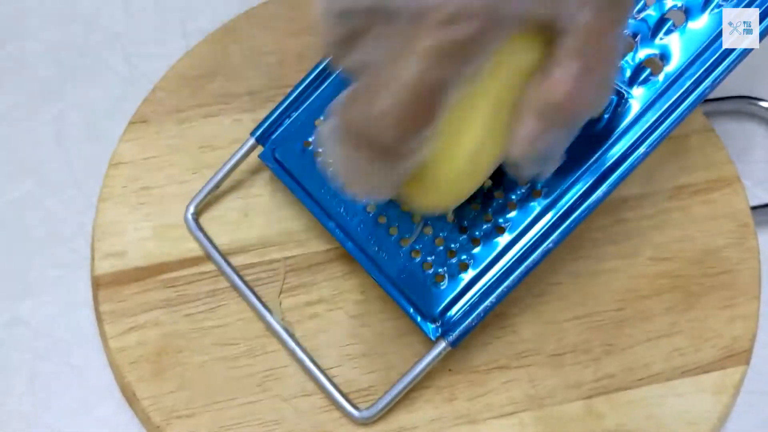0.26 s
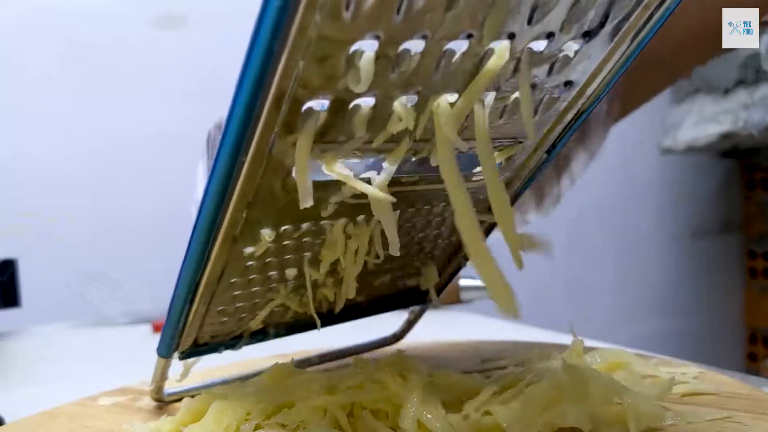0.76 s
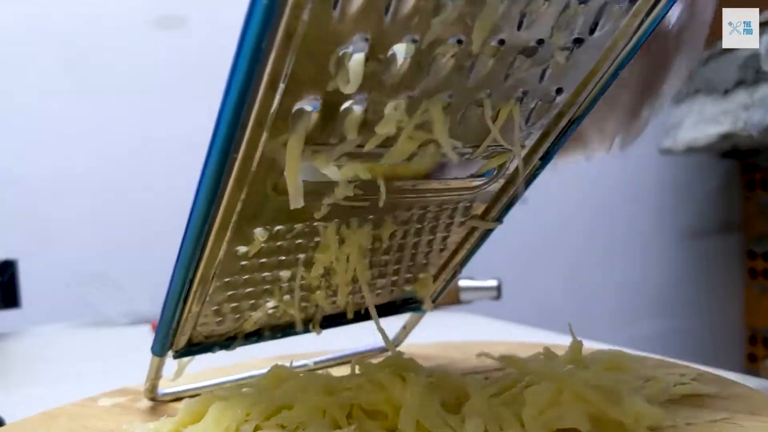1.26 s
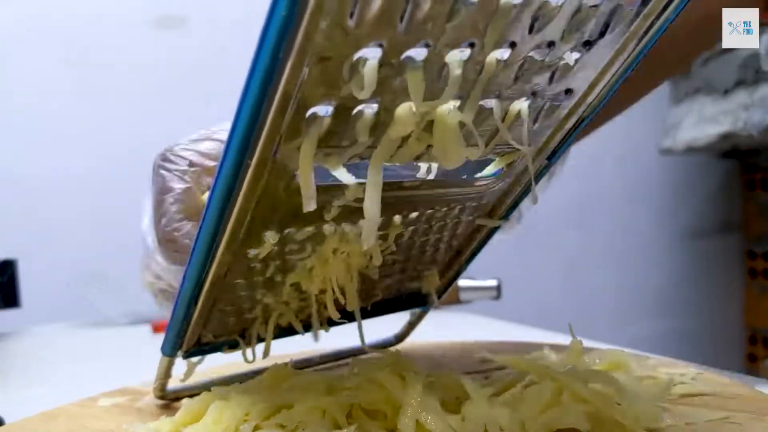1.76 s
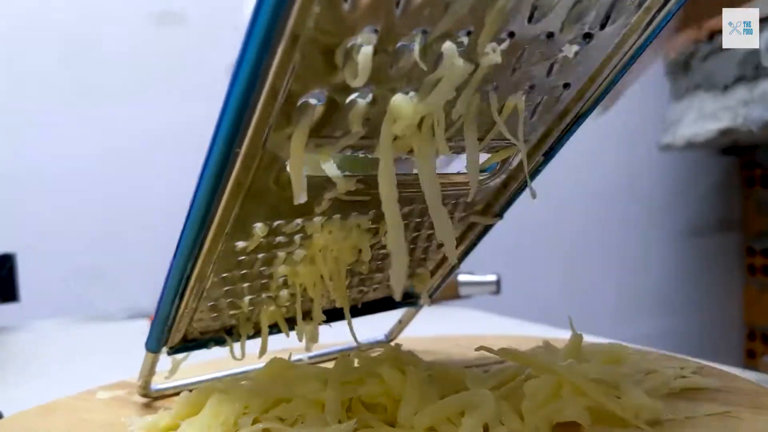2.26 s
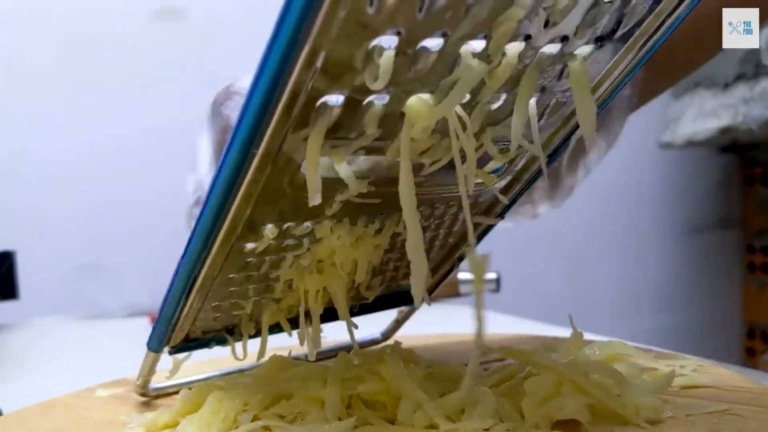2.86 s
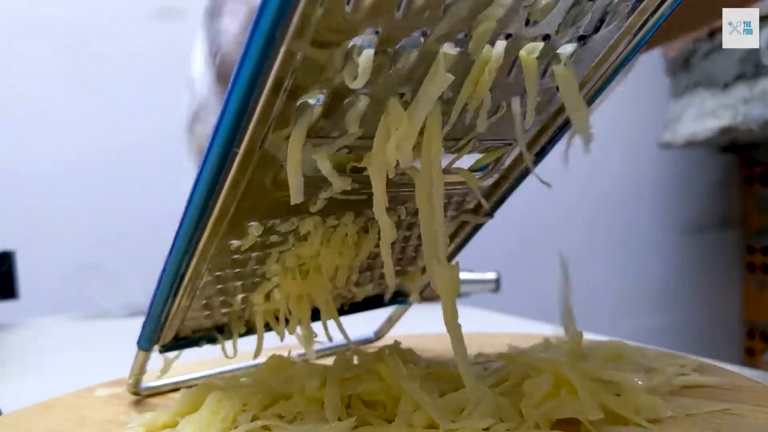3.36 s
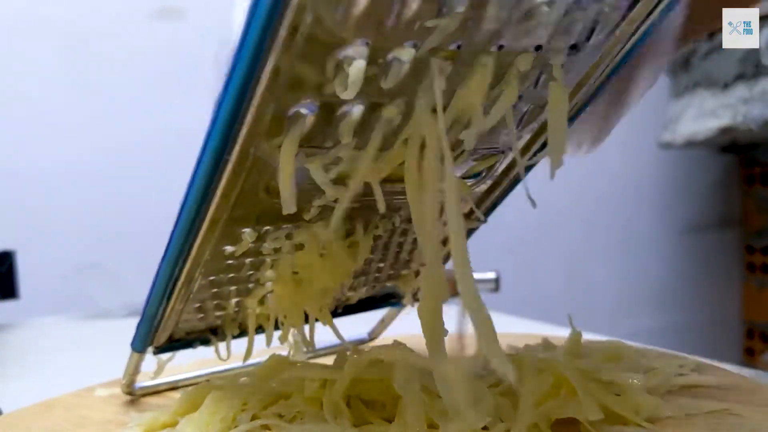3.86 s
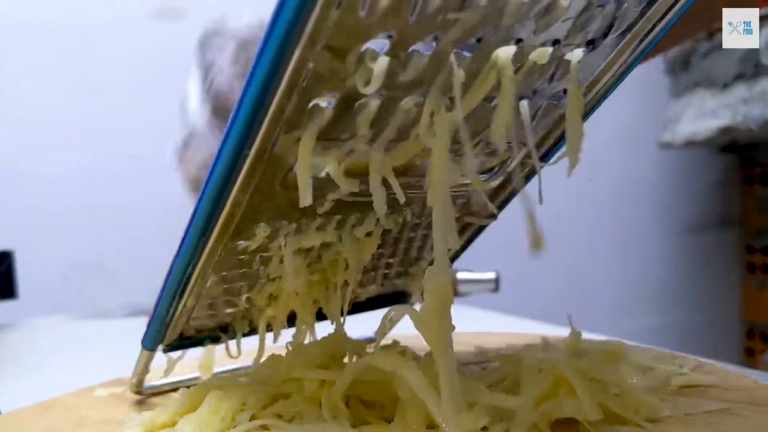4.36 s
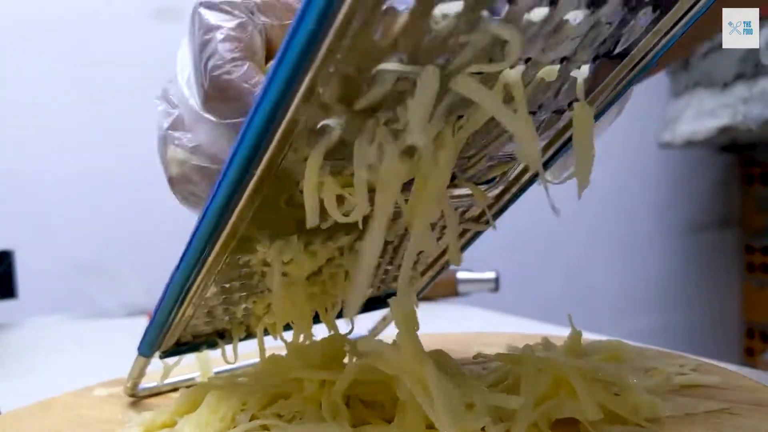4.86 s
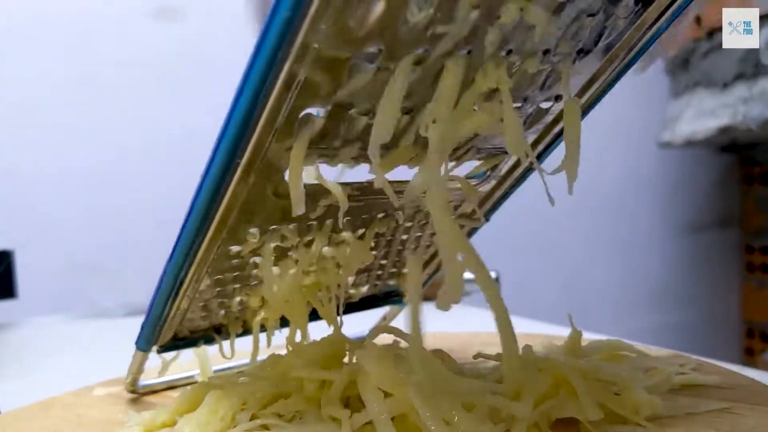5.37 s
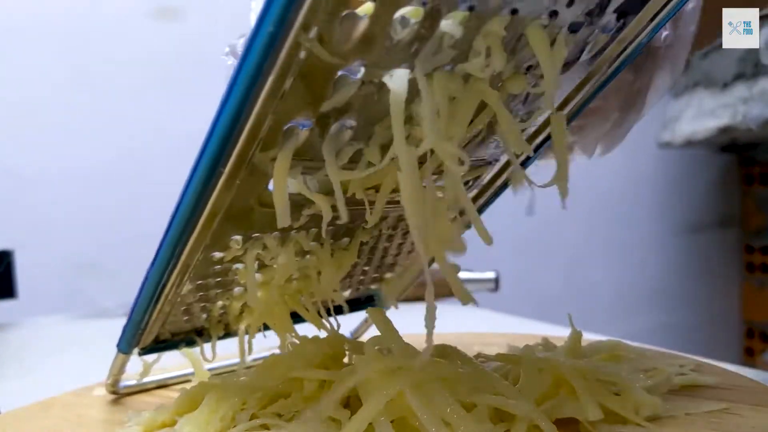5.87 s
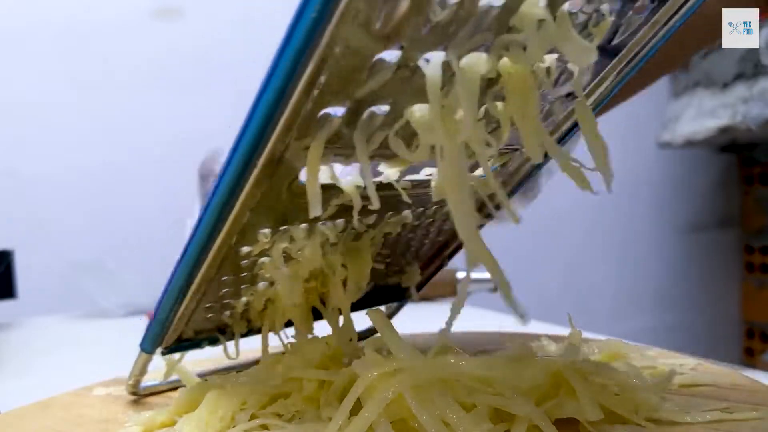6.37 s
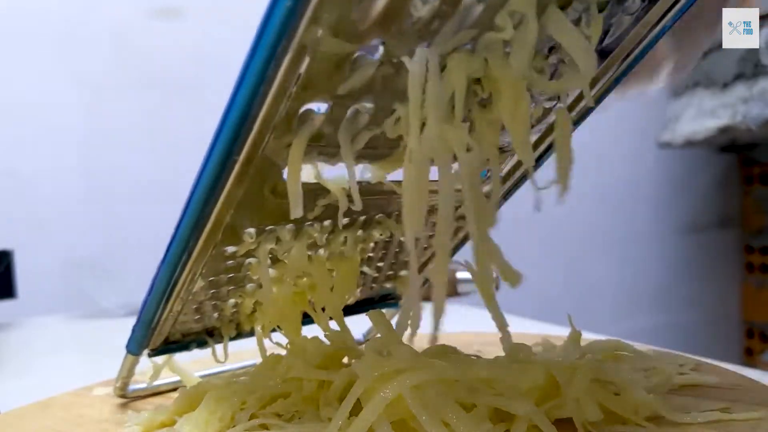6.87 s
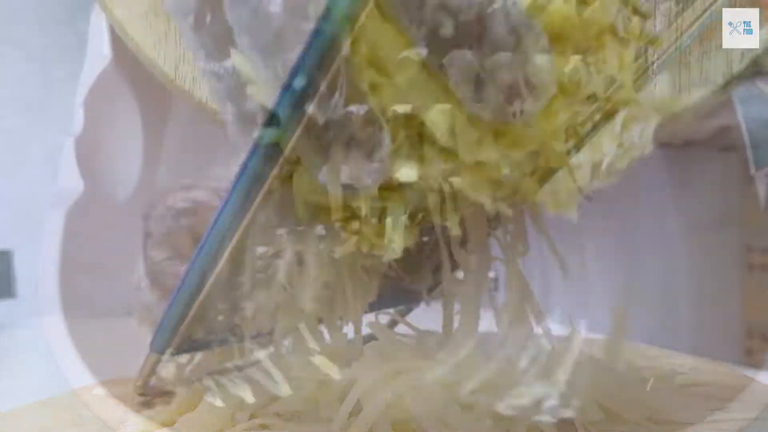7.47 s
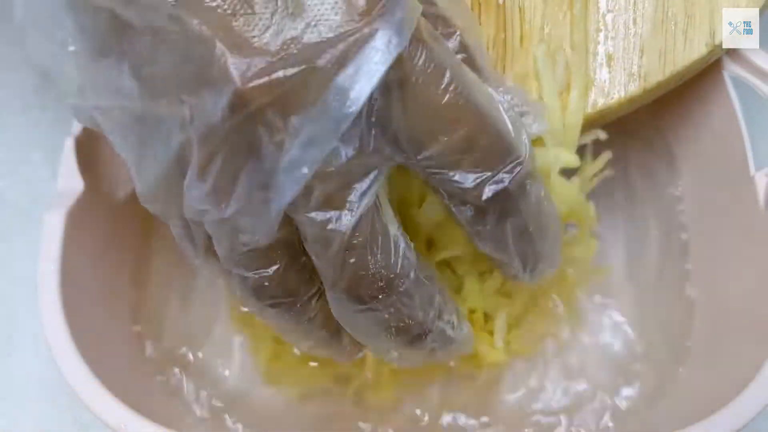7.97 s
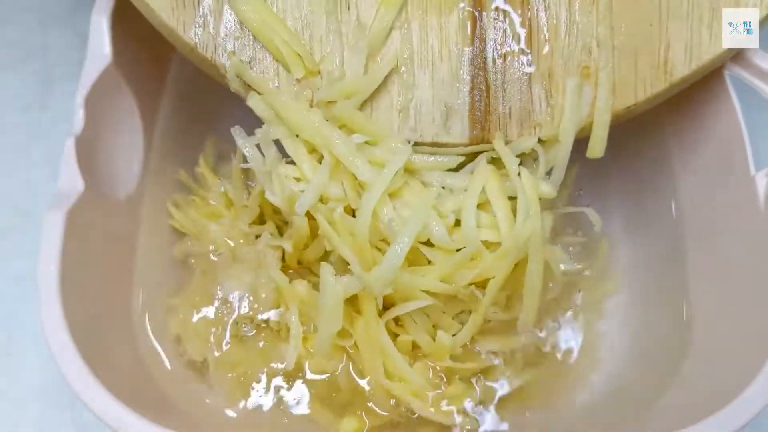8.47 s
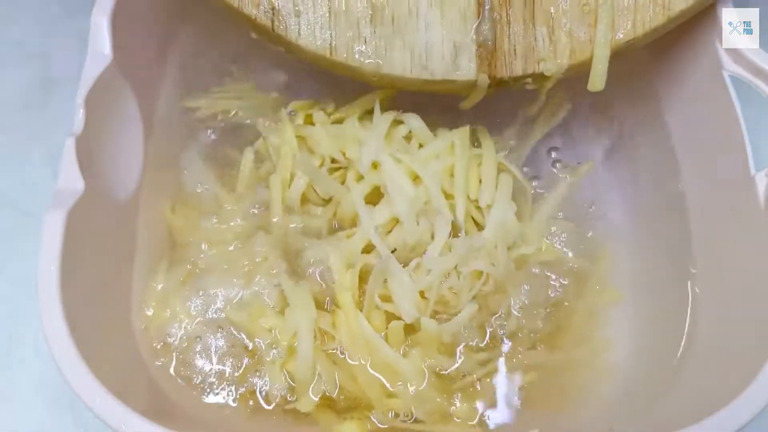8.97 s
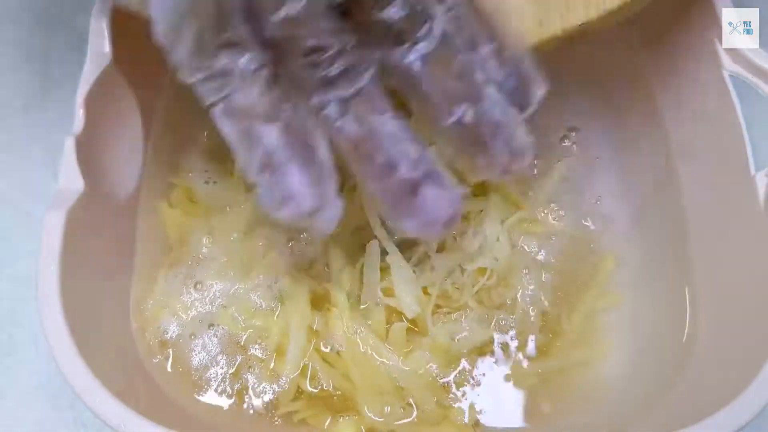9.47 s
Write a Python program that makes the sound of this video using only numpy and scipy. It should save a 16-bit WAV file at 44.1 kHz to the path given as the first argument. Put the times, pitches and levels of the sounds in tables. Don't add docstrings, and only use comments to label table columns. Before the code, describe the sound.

Crisp, wet grating at about three strokes a second with metallic ring and woody thuds, giving way to soft sloshing and rustling in a water bowl.

```python
import sys
import numpy as np
from scipy import signal
from scipy.fft import rfft, irfft, next_fast_len
from scipy.io import wavfile
from scipy.ndimage import uniform_filter1d, minimum_filter1d

SR = 44100
rng = np.random.default_rng(int(sys.argv[2]) if len(sys.argv) > 2 else 0)


def output_pcm(signal):
    pcm = np.clip(np.atleast_2d(signal).T, -1, 1) * 32767
    wavfile.write(sys.argv[1], SR, np.round(pcm).astype(np.int16))


def ratio_of_db(decibels):
    return 10 ** (np.asarray(decibels, float) / 20)


N = 428211

# (frequency [Hz], level per Hz [dB])
AIR = [(35, 0), (60, 8.5), (145, -1), (206, 6.5), (521, -10.5), (642, -7.5), (1100, -11.5), (1700, -9.5),
       (2530, -15.5), (5450, -31), (15500, -46)]
# (frequency [Hz], width [Hz], level [dB])
DRONE = [(129, 11.4, -14), (199.2, 1.3, 0), (231, 5, -11)]
# (frequency [Hz], width [Hz], level [dB])
WHINE = [(619, 1.5, -2), (667.5, 1.5, 0)]
# (time [s], drone level [dB], whine level [dB])
APPLIANCE = [(0, -51, -70), (7.2, -59, -58), (7.75, -51, -68), (8.3, -61, -63), (8.45, -54, -63),
             (8.75, -50, -63), (9.0, -48, -81), (9.3, -40.5, -67), (9.71, -49, -66)]
# (start [s], end [s], level [dB], frequency [Hz], width [Hz])
WALLOW = (8.55, 9.15, -55, 95, 45)

# (time [s], level [dB])
CRINKLE = [(0.0, -29), (0.21, -39), (0.54, -31), (0.64, -34), (1.1, -37), (1.91, -26.5), (2.59, -44),
           (3.07, -22.5), (4.01, -36), (5.52, -31), (5.83, -30.5), (6.97, -22.5), (7.45, -36)]
# (frequency [Hz], level per Hz [dB])
RUSTLE = [(1470, -42), (2500, 2), (2850, 2.5), (4430, 3.5), (5880, 5), (6390, 6), (9010, 2.5), (13900, 5.5),
          (15500, 4)]
# (time [s], peak [dB], centre frequency [Hz])
GLOVE_SNAPS = [(0.0323, -24, 3100), (0.269, -24, 3160), (0.3446, -32, 5380), (0.3834, -34, 6230),
               (0.414, -30.5, 5420), (0.439, -33, 7400), (0.9094, -31, 11100), (1.0164, -47, 3910),
               (1.0345, -52, 5280), (1.0475, -35, 11400), (1.916, -25, 3770), (1.924, -28.5, 5070),
               (2.0144, -23, 5270), (2.0537, -27, 3390), (2.319, -26, 4750), (2.375, -29.5, 5300),
               (2.7716, -28, 7140), (3.1124, -11, 9000), (3.1353, -42, 6300), (3.523, -30, 7400),
               (4.1854, -32, 4610), (4.2166, -20, 4460), (4.4952, -46, 7590), (4.7084, -41, 5330),
               (4.7855, -13.5, 7620), (5.7704, -34, 5000), (5.798, -29, 4230), (5.8714, -34, 8490),
               (6.5296, -24, 5350), (6.557, -20, 3980), (6.5884, -17, 3290), (6.9431, -23, 8500),
               (6.974, -33, 8100), (7.278, -30, 5380), (7.3914, -47, 4420)]
# (time [s], peak [dB], centre frequency [Hz])
BOWL_SNAPS = [(7.4684, -57, 8210), (7.4999, -25, 7120), (7.5305, -29, 5720), (7.558, -28, 6380),
              (7.5777, -26, 5450), (7.5953, -17.5, 7320), (7.6425, -29, 11300), (7.6735, -32, 5620),
              (7.72, -32, 6440), (7.7433, -31, 4860), (7.8244, -32, 13800), (7.854, -29, 8170),
              (7.8814, -38, 8060), (7.9049, -34.5, 8290), (7.9423, -27, 13500), (7.9807, -23, 13300),
              (7.9977, -24, 7500), (8.0245, -24, 6290), (8.083, -34, 6990), (8.097, -22, 5350),
              (8.1254, -19, 14000), (8.1664, -16.5, 10300), (8.168, -17.5, 6200), (8.2082, -24, 13000),
              (8.238, -23, 7260), (8.2955, -21, 9450), (8.3494, -30, 5550), (8.4207, -25, 5380),
              (8.4627, -32, 13200), (8.5074, -37, 5410), (8.865, -25, 7390), (8.88, -24, 13350),
              (8.9236, -29.5, 5400), (9.0808, -34, 5440), (9.1122, -30.5, 5380), (9.1734, -23, 13900),
              (9.1945, -35, 6410), (9.6824, -26, 6560)]
SNAP_DB, SNAP_NOISE_S, SNAP_TONE_S = 7.5, 0.014, 0.0067

# (time [s], level [dB], t60 [s], jolt of the frame [dB])
LANDINGS = [(0.023, -40.5, 0.52, 1.5), (0.411, -59, 0.075, -16), (0.638, -33.5, 0.21, -5),
            (0.932, -24, 0.097, -9.5), (1.308, -32, 0.072, -3), (1.647, -38, 0.055, 4),
            (2.006, -42.5, 0.045, -8.5), (2.995, -34.5, 0.19, -2), (3.032, -61, 0.3, -6),
            (3.173, -44.5, 0.33, -1), (3.442, -34, 0.085, -8.5), (3.9, -43.5, 0.54, 1.5),
            (3.854, -25.5, 0.066, -9.5), (4.207, -44.5, 0.46, 3.5), (4.496, -38, 0.19, -1),
            (4.996, -55.5, 0.3, -7), (5.147, -37.5, 0.25, -1.5), (5.795, -57, 0.024, -7),
            (5.826, -37.5, 0.45, -0.5), (6.517, -37, 0.35, 0.5), (6.862, -29, 0.34, -2.5),
            (7.324, -35, 0.088, -1.5), (7.37, -27, 0.0056, -23)]
LAND_S, STAY_S = 0.0081, 0.013
# (start [s], rise [s], length [s], bite [dB], plate ring over the tearing [dB])
CUTS = [(0.068, 0.012, 0.097, -25.5, -3.5), (0.462, 0.07, 0.084, -24.5, -7.5),
        (0.678, 0.02, 0.13, -24, -9.5), (1.054, 0.053, 0.099, -22.5, -8), (1.366, 0.039, 0.084, -23, -8),
        (1.686, 0.031, 0.1, -22, 0.3), (2.067, 0.055, 0.09, -21, 0.5), (2.471, 0.019, 0.14, -25, 2.5),
        (2.861, 0.055, 0.086, -20, -10.5), (3.209, 0.038, 0.067, -20.5, -11.5),
        (3.585, 0.017, 0.15, -23.5, -9.5), (3.947, 0.052, 0.087, -17.5, -12.5),
        (4.274, 0.032, 0.061, -20.5, -9.5), (4.574, 0.041, 0.062, -21, -9),
        (4.885, 0.027, 0.053, -22.5, -11), (5.189, 0.048, 0.09, -19, -11.5),
        (5.514, 0.039, 0.1, -19.5, -11), (5.874, 0.027, 0.058, -21.5, -13.5),
        (6.18, 0.048, 0.073, -19, -11), (6.328, 0.031, 0.05, -25, -7.5), (6.629, 0.031, 0.1, -22, -6.5),
        (6.978, 0.047, 0.079, -20, -9), (7.114, 0.002, 0.018, -30.5, -8)]
LET_GO_S = [0.16, 0.097, 0.063, 0.088, .11, 0.11, 0.17, 0.057, 0.1, 0.19, 0.072, 0.085, 0.12, 0.12, 0.068,
            0.061, 0.12, 0.047, 0.072, 0.1, .11, 0.22, 0.17]
GRIP_DB = [-1, -0.5, 2, 2.5, 2, 0.9, 0.8, 0.8, 1.2, 3, 1, 1.5, 3.5, 1, -2, -1, 0.2, -2.5, 2.5, 1.5, 2, 0.5,
           1.5]
# (start [s], swell [s], level [dB], t60 [s], jolt of the frame [dB])
RETURNS = [(1.044, 0.014, -40, 0.6, 15), (2.756, 0.025, -42.5, 0.25, 4.5), (3.068, 0.038, -31, 0.9, -5),
           (3.472, 0.012, -42, 1, -6), (4.774, 0.0089, -31, 0.36, -1.5), (5.045, 0.022, -41.5, 1, -6.5),
           (5.382, 0.11, -34, 0.067, -3.5), (6.05, 0.11, -35.5, 0.026, -8), (6.547, 0.022, -38, 0.24, 5.5)]
DIG_IN = 0.78
SAG_DB, LET_GO_BEND = -1.8, 1.766
TRAIL_DB, TRAIL_S = -21, 0.85
LINGER_DB, LINGER_S = -55, 0.15
BUZZ_DB, SHUDDER_DB, BUZZ_PER_RING = -8.5, -11, 0.37
RING_GROWS_DB, BUZZ_GROWS_DB, SHUDDER_GROWS_DB = 6, 5.5, 1.5
LIGHT_RING_DB, RING_PER_JOLT, LIGHT_SHUDDER_DB, SHUDDER_PER_JOLT = -3, 0.87, 0.5, 1.23
LESS_BUZZ_UNTIL_S, LESS_BUZZ_DB = 0.537, -4.5

# (frequency [Hz], level per Hz [dB])
TEAR = [(900, -47), (1500, -28.5), (2500, -8.5), (3580, -15), (4680, -7.5), (6900, -6.5), (7510, -0.5),
        (9080, -4), (13200, -4.5), (15500, -6.5)]
# (frequency [Hz], level per Hz [dB])
PLATE_BODY = [(500, -38), (1100, -10), (1500, -4), (2500, -0.5), (3500, 0.5), (4500, -2), (8000, -10)]
# (frequency [Hz], width [Hz], level [dB])
PLATE = [(1623, 160, -14), (2114, 190, -7), (2737, 150, -2.5), (2886, 75, 1), (3250, 74, -5),
         (4260, 420, -9), (5380, 330, -3), (6560, 350, -1.5), (7180, 40, -6.5), (8210, 150, -12)]
# (frequency [Hz], width [Hz], level [dB])
FRAME = [(277.2, 46.4, 1.5), (423, 107, -1), (514, 35.6, 5), (716, 275, -3.5), (845, 95, 1.5),
         (1022, 250, -7)]
# (frequency [Hz], width [Hz], level [dB])
BOARD = [(55.3, 11, -7), (124.2, 24.6, 0.5), (192, 65, 5.5), (255, 175, -3)]
CALM_DB = -29

# (time [s], peak [dB])
TICKS = [(0.032, -21), (0.27, -30.5), (0.945, -33), (0.985, -38), (1.652, -39), (1.1954, -27),
         (1.229, -27.5), (1.2554, -35), (2.2324, -20), (2.2736, -23), (2.6514, -20.5), (2.691, -21),
         (2.7994, -31), (3.3475, -27), (4.379, -22), (4.421, -28), (4.4737, -30), (4.4935, -35),
         (4.515, -36), (4.536, -33), (5.327, -28)]
# (frequency [Hz], width [Hz], level [dB])
LOOSE_PLATE = [(1670, 42, -8), (1850, 200, -11), (2300, 1600, -12), (2860, 28, -5), (4290, 300, -14),
               (5350, 45, -10)]
# (time [s], peak [dB])
PINGS = [(0.938, -29), (1.065, -36), (1.115, -29), (1.315, -32.5), (1.44, -28), (4.212, -35),
         (4.782, -22.5), (4.81, -41), (5.55, -27), (5.6, -31), (6.868, -29), (6.905, -30.5)]
# (frequency [Hz], width [Hz], level [dB])
FREE_FRAME = [(519, 10, 5.5), (753, 39, -7), (926, 45, -11)]
# (time [s], peak [dB])
BOWL_KNOCKS = [
    (7.814, -40),
    (9.237, -39),
]
# (frequency [Hz], width [Hz], level [dB])
BOWL = [(210, 6.8, 13), (290, 20, -2), (416, 27, -11), (663, 21, 2), (980, 53, 1.5), (1620, 140, 1),
        (2600, 900, -10)]

# (time [s], peak [dB], pitch [Hz], cycles to the top)
BUMPS = [(0.041, -24.5, 134, 1.7), (0.154, -25.5, 240, 0.84), (0.235, -17.5, 132, 1.5),
         (0.476, -31.5, 132, 1.3), (0.694, -41, 196, 2.5), (0.76, -27, 181, 1.1), (0.795, -25, 142, 1.7),
         (0.949, -26, 196, 1.5), (1.146, -15, 140, 1.54), (1.188, -13, 167, 1.26), (1.414, -23, 189, 1.8),
         (1.469, -24.5, 183, 1.85), (1.737, -28, 160, 1.3), (1.787, -19.5, 153, 1.3),
         (2.141, -22.5, 124, 2.8), (2.221, -12.5, 130, 0.72), (2.491, -15, 128, 0.91),
         (2.538, -17.5, 190, 1.9), (2.594, -16.5, 141, 1.9), (2.629, -4.5, 170, 1.45),
         (2.776, -26, 122, 1.8), (2.927, -16.5, 142, 1.2), (3.122, -30, 161, 1.4),
         (3.276, -13.5, 173, 1.33), (3.54, -30, 156, 1.4), (3.665, -29, 129, 1.7), (3.733, -19, 144, 1.14),
         (3.876, -21, 129, 1.6), (3.927, -24, 137, 1.4), (4.049, -17, 154, 1.3), (4.225, -32, 180, 1.8),
         (4.34, -16, 145, 1.3), (4.358, -21, 193, 1.4), (4.374, -6.5, 174, 1.73), (4.513, -23.5, 128, 1.1),
         (4.651, -17, 142, 1.4), (4.8, -33, 220, 2.8), (5.232, -38, 197, 2.4), (5.282, -25, 203, 1.1),
         (5.542, -29, 147, 1.5), (5.634, -21, 140, 1.6), (5.926, -31.5, 139, 1.8), (6.151, -32, 188, 2.7),
         (6.222, -18.5, 163, 1.65), (6.379, -22, 160, 1.2), (6.412, -17, 158, 1), (6.579, -28, 168, 1.8),
         (6.689, -19.5, 195, 2), (6.778, -16.5, 130, 0.78), (6.884, -28, 127, 1.7), (7.044, -22, 157, 1.3)]
# (time [s], peak [dB], pitch [Hz], cycles to the top)
ROCKS = [(0.8, -47, 70, 0.74), (1.429, -37, 97, 1.5), (2.224, -26, 66, 0.61), (2.629, -23.5, 71, 0.57),
         (4.372, -21, 81.6, .9), (4.421, -36, 110, 1.7), (5.297, -28.5, 136, 1.2), (5.29, -43, 66, 0.57),
         (6.249, -37, 85, 0.86), (6.778, -34, 66, 0.64), (7.081, -23, 170, 1.4), (7.061, -26, 330, 2.3),
         (7.132, -24, 177, 1.6)]
# (time [s], peak [dB], pitch [Hz], cycles to the top, left-right [dB])
BOWL_BUMPS = [(7.343, -31.5, 203, 2.8, 5), (7.82, -37, 210, 1.14, 8), (9.134, -25.5, 113, 1.15, -8),
              (9.234, -21, 235, 2.8, 3), (9.487, -36, 109, 1.6, -2)]
# (frequency [Hz], width [Hz], level [dB])
TABLE = [(42.7, 6, 1), (62.1, 7.6, 8.5), (132, 11, -8), (224.2, 7, -3.5), (330, 13, -31)]
BOARD_PAN_DB = 7
BUMP_LEAD_S, BUMP_SAG = 0.002, 0.063
OVERTONE, OVERTONE_DB = 1.91, -17.5
HARD_SWELL, HARD_STOP = 0.11, 0.26
RATTLE_DB, RATTLE_S = -20.5, 0.41

# (strongest [s], swell [s], ebb [s], rustle [dB], slosh over it [dB])
SWEEPS = [(7.585, 0.055, 0.05, -43.5, -14), (7.66, 0.06, 0.13, -54, -11), (7.85, 0.22, 0.08, -53, -12),
          (8.05, 0.49, 0.6, -44.5, -8), (8.28, 0.28, 0.11, -45, -15), (8.42, 0.024, 0.027, -70, -12),
          (8.475, 0.026, 0.053, -42, -1.5), (8.65, 0.26, 0.18, -40.5, -8.5), (8.78, 0.12, 0.12, -54, -14),
          (9.06, 0.08, 0.082, -52.5, -10), (9.2, 0.17, 0.13, -38.5, -7.5), (9.36, 0.33, 0.17, -42, -10),
          (9.49, 0.91, 0.063, -40, -8.5), (9.7, 0.33, 0.1, -48, -17)]
SWELL_DB, EBB_DB, STOP_DB_PER_S = 34.5, 5.5, 500
SWEEP_BEND = 1.44
STILL_DB = -60
# (frequency [Hz], level per Hz [dB])
SLOSH = [(400, -3.5), (700, -11), (1100, -1.5), (1900, 7), (2800, -3.5), (4000, -17), (6000, -28)]
# (time [s], level [dB], frequency [Hz], t60 [s])
SQUELCH = (8.921, -41, 2650, .1)

# (frequency [Hz], likeness [-1 to 1])
ALIKE = [(60, .85), (130, .93), (290, .9), (640, .8), (1410, .45), (3100, .15), (6800, .05), (15000, 0)]
# (frequency [Hz], likeness [-1 to 1])
ALIKE_AIR = [(60, -0.27), (180, 1), (550, 0.87), (1650, 0.41), (4970, 0.082), (15000, -0.39)]
# (frequency [Hz], left-right [dB])
LEAN = [(60, 5), (130, 7), (300, 1), (1300, 1), (3000, 2.5), (8000, -.5), (15000, 1)]
# (frequency [Hz], t60 [s])
KITCHEN = [(150, 0.18), (2000, 0.35), (12000, 0.013)]
TOP_HZ = 15750


def unit(x):
    return x / np.sqrt(np.mean(x ** 2) + 1e-20)


def along(points, hz):
    f, v = np.transpose(points)
    return np.interp(np.log(hz + 1), np.log(f + 1), v)


def curves(tables):
    s, *cols = np.vstack(tables).T
    return [np.interp(np.arange(N) / SR, s, c) for c in cols]


def filtered(x, response):
    m = next_fast_len(N + SR // 2)
    return irfft(rfft(x, m) * response(np.fft.rfftfreq(m, 1 / SR)), m)[..., :N]


def modes(table):
    def response(f):
        total = 0
        for k, (hz, width, db) in enumerate(table):
            total = total + (-1) ** k * ratio_of_db(db) * 1j * f * width / (hz * hz - f * f + 1j * f * width)
        return total
    return response


def shape(points):
    return lambda f: ratio_of_db(along(points, f))


def grit(per_s, spread_db, life_s, alike):
    draw = rng.random((2, N))
    sizes = (draw[0] < per_s / SR) * ratio_of_db(-spread_db * np.log(draw[1] + 1e-9))
    fade = np.exp(-1 / (life_s * SR))
    noise = signal.lfilter([1], [1, -fade], sizes) * rng.standard_normal((2, N))
    turn = lambda f: np.arccos(np.clip(along(alike, f), -1, 1)) / 2
    mid, side = filtered(noise, lambda f: np.array([np.cos(turn(f)), np.sin(turn(f))]))
    return np.array([mid + side, mid - side])


def patchy(x, depth_db):
    z = signal.stft(x, nperseg=512)[2]
    field = uniform_filter1d(rng.standard_normal(z.shape[1:]), size=7, axis=0)
    field = uniform_filter1d(field, size=8, axis=1)
    return signal.istft(z * ratio_of_db(depth_db * unit(field)), nperseg=512)[1][:, :N]


def kitchen_air():
    air = unit(filtered(grit(22000, 0.7, 0.00081, ALIKE_AIR), shape(AIR)))
    drone_db, whine_db = curves([APPLIANCE])
    hum = grit(12000, .7, 0.0033, ALIKE_AIR)
    drone = ratio_of_db(drone_db) * unit(filtered(hum, modes(DRONE)))
    whine = ratio_of_db(whine_db) * unit(filtered(hum, modes(WHINE)))
    start, end, db, hz, width = WALLOW
    rocking = np.sin(np.pi * np.clip((np.arange(N) / SR - start) / (end - start), 0, 1)) ** .5
    wallow = ratio_of_db(db) * rocking * unit(filtered(hum, lambda f: modes([(hz, width, 0)])(f) ** 2))
    return ratio_of_db(-48.0) * air + drone + whine + wallow


def glove():
    (level_db,) = curves([CRINKLE])
    grating_time = np.arange(N) / SR < CRINKLE[-1][0]
    crinkle = unit(grit(500, 1.9, .0008, ALIKE_AIR))
    slide = unit(patchy(grit(4200, 1.8, 0.0015, ALIKE_AIR), depth_db=5.0))
    return grating_time * ratio_of_db(level_db - 19.5) * unit(filtered(1.8 * crinkle + slide, shape(RUSTLE)))


def contact():
    t = np.arange(N) / SR
    rows = []
    for (s, rise, held, db, ring_db), t60, grip_db in zip(CUTS, LET_GO_S, GRIP_DB):
        rows.append((s, rise, held, db, t60, ring_db, 1, grip_db))
    rows += [(s, LAND_S, STAY_S, db, t60, jolt_db, 0, 0) for s, db, t60, jolt_db in LANDINGS]
    rows += [(s, swell, swell, db, t60, jolt_db, 0, 0) for s, swell, db, t60, jolt_db in RETURNS]
    rows = np.array(sorted(rows))
    latest = np.maximum(np.searchsorted(rows[:, 0], t) - 1, 0)
    s, rise, held, db, t60, colour_db, cut, grip_db = rows[latest].T
    u = t - s
    way = np.clip(u / held, 0, 1) - .5
    after = np.maximum(u - held, 0)
    fade = ratio_of_db(-60 * (after / t60) ** np.where(cut, LET_GO_BEND, 1))
    fade += ratio_of_db(np.where(cut, TRAIL_DB - 60 * after / TRAIL_S, LINGER_DB - 60 * after / LINGER_S))
    attack = np.clip(u / rise, 0, 1) ** np.where(cut, DIG_IN, 0.87)
    force = attack * ratio_of_db(db + cut * SAG_DB * way) * fade
    force = minimum_filter1d(-minimum_filter1d(-force, size=401), size=401)
    ring_db = np.where(cut, colour_db + RING_GROWS_DB * way, LIGHT_RING_DB + RING_PER_JOLT * colour_db)
    buzz_db = np.where(cut, BUZZ_DB + BUZZ_PER_RING * colour_db + BUZZ_GROWS_DB * way, colour_db)
    buzz_db += grip_db + LESS_BUZZ_DB * (t < LESS_BUZZ_UNTIL_S)
    light_shudder_db = LIGHT_SHUDDER_DB + SHUDDER_PER_JOLT * colour_db
    shudder_db = np.where(cut, SHUDDER_DB + SHUDDER_GROWS_DB * way, light_shudder_db)
    levels_db = uniform_filter1d([ring_db, buzz_db, shudder_db], size=600, axis=1)
    return uniform_filter1d(force, size=88), *levels_db


def grating():
    bite, ring_db, buzz_db, shudder_db = contact()
    tear = unit(filtered(grit(9000, 1.4, .0006, ALIKE), shape(TEAR)))
    body = unit(filtered(grit(3000, 2.5, .001, ALIKE), shape(PLATE_BODY)))
    drive = grit(4000, 0.97, 0.0034, ALIKE)
    shake = grit(1500, 1.0, 0.0015, ALIKE)
    ring = filtered(bite * ratio_of_db(ring_db) * drive, modes(PLATE)) / np.std(filtered(drive, modes(PLATE)))
    buzz = filtered(bite * ratio_of_db(buzz_db) * shake, modes(FRAME)) / np.std(filtered(shake, modes(FRAME)))
    rasp = bite * patchy(tear + ratio_of_db(ring_db - 2.0) * body, depth_db=1.5)
    ring = ratio_of_db(-7.0) * patchy(ring, depth_db=5.0)
    return rasp + ring + ratio_of_db(-1.0) * buzz + board(bite, shudder_db)


def board(bite, shudder_db):
    keep = np.exp(-1 / (0.026 * SR))
    load = signal.lfilter([1 - keep], [1, -keep], bite) * ratio_of_db(shudder_db + 2.0)
    narrow = lambda f: modes(BOARD)(f) / (1 + 1j * f / 260) ** 2
    shudder = unit(filtered(grit(400, 0.68, 0.0021, ALIKE), narrow))
    return np.minimum(load, ratio_of_db(CALM_DB)) * shudder


def knocks(events, body, gain_db, soft_s):
    blows, t = np.zeros((2, N)), np.arange(SR // 100) / SR
    for s, db in events:
        noise = rng.standard_normal(len(t)) + 0.88 * rng.standard_normal((2, len(t)))
        blows[:, round(s * SR):][:, :len(t)] = ratio_of_db(db + gain_db) * np.exp(-t / soft_s) * noise
    return filtered(blows, lambda f: modes(body)(f) / (1 + 1j * f / 3500) ** 2)


def snaps():
    out, t = np.zeros((2, N + SR)), np.arange(SR // 50) / SR
    rows = GLOVE_SNAPS + BOWL_SNAPS
    noise = np.diff(rng.standard_normal((len(rows), 2, len(t) + 1)))
    for (s, db, hz), hiss in zip(rows, noise):
        burst = 0.19 * hiss * ratio_of_db(-60 * t / SNAP_NOISE_S)
        burst = burst + 0.3 * np.sin(2 * np.pi * hz * t) * ratio_of_db(-60 * t / SNAP_TONE_S)
        out[:, round(s * SR):][:, :len(t)] += ratio_of_db(db + SNAP_DB) * (1 - np.exp(-t / 0.00014)) * burst
    return out[:, :N] * ratio_of_db([[1.5], [-1.5]])


def bumps():
    out, t = np.zeros((2, N + SR)), np.arange(SR // 8) / SR
    rows = [(*b, BOARD_PAN_DB) for b in BUMPS + ROCKS] + BOWL_BUMPS
    for s, db, hz, cycles, pan_db in rows:
        u = t * hz / np.clip(cycles * ratio_of_db(HARD_SWELL * (db + 16.5)), .6, 4)
        late = np.where(u > 1, 1 + (u - 1) * ratio_of_db(HARD_STOP * max(db + 25.5, 0)), u)
        turn = 2 * np.pi * hz * t * (1 + BUMP_SAG * (1 - u / 2))
        push = (late * np.exp(1 - late)) ** 2.34 * np.sin(turn)
        push += ratio_of_db(OVERTONE_DB) * (u * np.exp(1 - u)) ** 4.0 * np.sin(OVERTONE * turn)
        gains = ratio_of_db([[db - .6 + pan_db / 2], [db - .6 - pan_db / 2]])
        out[:, round((s - BUMP_LEAD_S) * SR):][:, :len(t)] += gains * push
    return filtered(out[:, :N], lambda f: 1 + ratio_of_db(7.5) * modes(TABLE)(f))


def rattle():
    level, t = np.zeros(N + SR), np.arange(SR // 4) / SR
    for s, db, *_ in BUMPS + BOWL_BUMPS:
        fade = ratio_of_db(db + RATTLE_DB - 60 * t / RATTLE_S)
        level[round(s * SR):][:len(t)] += fade * (1 - np.exp(-t / 0.039))
    low = lambda f: (modes(FRAME)(f) + ratio_of_db(1.0) * modes(BOARD)(f)) / (1 + 1j * f / 420) ** 2
    shake = grit(990, 0.93, 0.0045, ALIKE)
    return filtered(level[:N] * shake, low) / np.std(filtered(shake, low))


def sweeps():
    t = np.arange(N) / SR
    rustle, slosh = np.full((2, N), ratio_of_db(STILL_DB))
    for top, swell_s, ebb_s, db, slosh_db in SWEEPS:
        swell = np.clip((top - t) / swell_s, 0, 1)
        ebb = np.clip((t - top) / ebb_s, 0, 1)
        away = np.clip(np.maximum(top - swell_s - t, t - top - ebb_s), 0, 1)
        move = ratio_of_db(-SWELL_DB * swell ** SWEEP_BEND - EBB_DB * ebb ** SWEEP_BEND - STOP_DB_PER_S * away)
        rustle = np.maximum(rustle, ratio_of_db(db) * move)
        slosh = np.maximum(slosh, ratio_of_db(db + slosh_db) * move)
    return rustle, slosh


def rinsing():
    rustling, sloshing = sweeps()
    t = np.arange(N) / SR
    dryness = np.clip((8.55 - t) / 0.2, .15, .68)
    crackle = unit(filtered(grit(1600, 1.9, .0004, ALIKE_AIR), shape(RUSTLE)))
    slide = unit(patchy(filtered(grit(4300, 1.2, 0.0056, ALIKE_AIR), shape(RUSTLE)), depth_db=2.8))
    slosh = unit(patchy(filtered(grit(1500, 2.5, .002, ALIKE_AIR), shape(SLOSH)), depth_db=3))
    rustle = np.sqrt(dryness) * crackle + np.sqrt(1 - dryness) * slide
    wet = (t > CRINKLE[-1][0]) * (ratio_of_db(6.0) * rustling * rustle + sloshing * slosh)
    s, db, hz, t60 = SQUELCH
    squeeze = np.clip((t - s) / 0.0051, 0, 1) * ratio_of_db(db - 60 * np.clip(t - s - 0.025, 0, 1) / t60)
    bubbling = filtered(grit(3000, 1.6, 0.002, ALIKE_AIR), lambda f: modes([(hz, 1700, 0)])(f) ** 3)
    return (wet + squeeze * unit(bubbling)) * ratio_of_db([[1.8], [-1.8]])


def walls(x):
    hz, t, z = signal.stft(rng.standard_normal((2, SR // 3)), SR, nperseg=256)
    tail = signal.istft(z * ratio_of_db(-60 * t / along(KITCHEN, hz)[:, None]), SR, nperseg=256)[1]
    return signal.fftconvolve(x, tail / np.linalg.norm(tail[0]), axes=1)[:, :N]


def scene():
    sides = np.array([[.5], [-.5]])
    lead = lambda f, s: np.exp(2j * np.pi * f * s * sides)
    ticks = knocks(TICKS, LOOSE_PLATE, gain_db=17.0, soft_s=0.0063)
    pings = knocks(PINGS, FREE_FRAME, gain_db=24.0, soft_s=0.0092)
    bowl = knocks(BOWL_KNOCKS, BOWL, gain_db=24.0, soft_s=0.0039)
    grater = filtered(grating() + ticks + pings, lambda f: ratio_of_db(sides * along(LEAN, f)) * lead(f, .00005))
    basin = filtered(bowl + rinsing() + snaps() + kitchen_air(), lambda f: lead(f, 0.00017))
    near = grater + bumps() + rattle() + glove() + basin
    return near + ratio_of_db(-14) * walls(near)


def band_limit(x):
    return signal.sosfilt(signal.butter(12, 16820, fs=SR, output="sos"), x)


def record(dry):
    band = lambda f: np.where(f < TOP_HZ, 1, ratio_of_db(-55)) * (1j * f / (26 + 1j * f)) ** 4
    rounded = dry / (1 + np.abs(dry / .97) ** 6) ** (1 / 6)
    return band_limit(filtered(rounded, band))


dry = scene()
out = record(dry)
output_pcm(out)
```